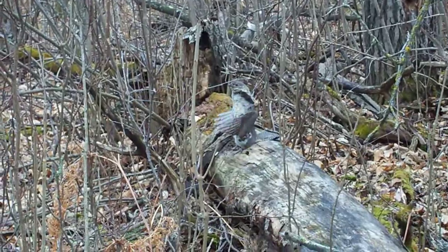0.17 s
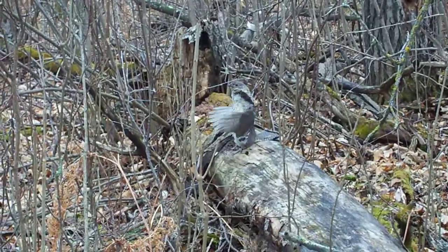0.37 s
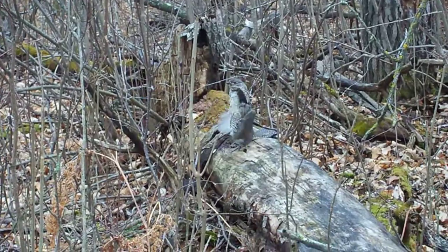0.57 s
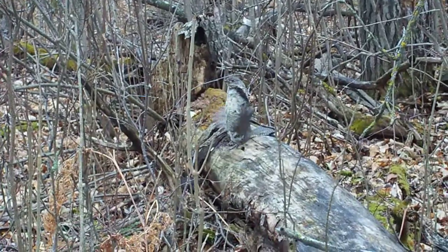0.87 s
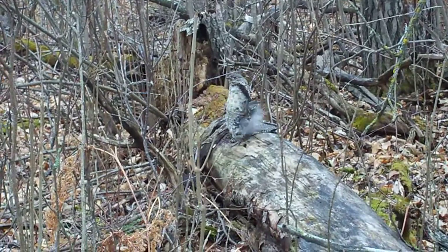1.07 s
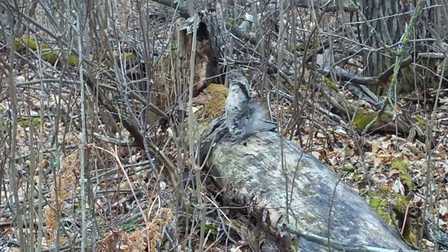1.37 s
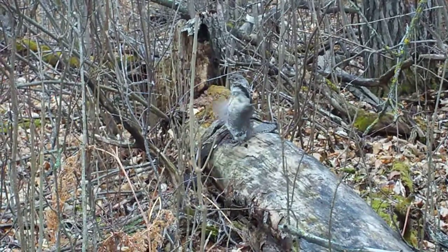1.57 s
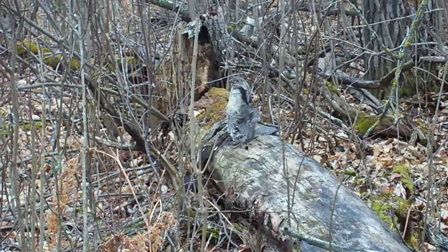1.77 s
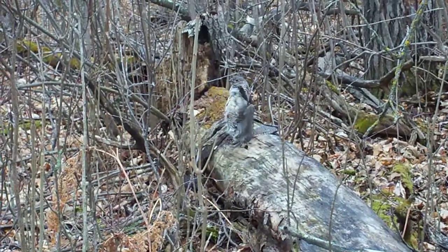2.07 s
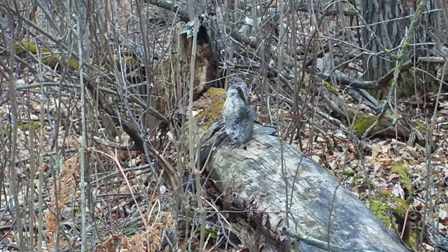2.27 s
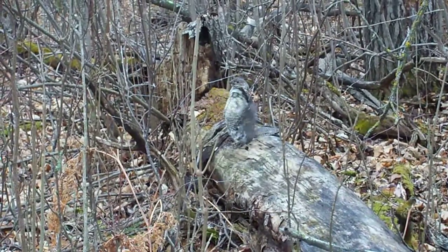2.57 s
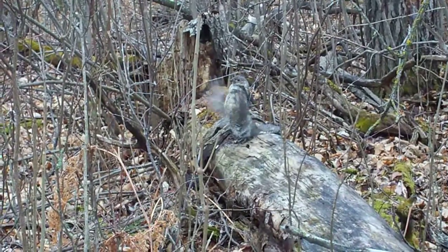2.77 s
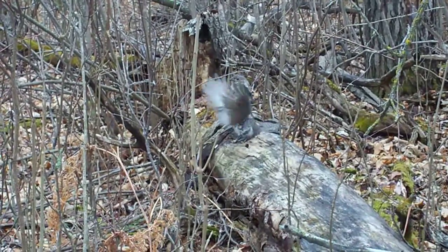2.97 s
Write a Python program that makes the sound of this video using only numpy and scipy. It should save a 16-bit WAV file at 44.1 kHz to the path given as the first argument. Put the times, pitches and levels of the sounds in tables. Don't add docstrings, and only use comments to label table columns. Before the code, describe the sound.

A grouse drums its wings in deep soft thumps that quicken into a whirring flutter, quiet forest

```python
import sys
import numpy as np
from scipy import signal
from scipy.fft import rfft, irfft
from scipy.io import wavfile
from scipy.ndimage import uniform_filter1d

SR = 44100
rng = np.random.default_rng(int(sys.argv[2]) if len(sys.argv) > 2 else 0)


def field_ratio(decibels):
    return 10 ** (np.asarray(decibels, dtype=float) / 20)


def put_to_file(sound):
    columns = np.atleast_2d(sound).T
    safe = np.clip(columns, -1, 1)
    whole_steps = np.round(safe * 32767)
    wavfile.write(sys.argv[1], SR, whole_steps.astype(np.int16))


N = 138033


def coloured(points, x):
    hz = np.fft.rfftfreq(len(x), 1 / SR)
    point_hz, point_db = np.transpose(points)
    gain_db = np.interp(np.log(hz + 1), np.log(point_hz + 1), point_db, -99, -99)
    y = irfft(rfft(x) * field_ratio(gain_db), len(x))
    return y / np.std(y)


def slow(span_s):
    span = int(span_s * SR)
    x = uniform_filter1d(uniform_filter1d(rng.standard_normal(N), span), span)
    return x / np.std(x)


def ring(x, hz, width_hz):
    return signal.lfilter(*signal.iirpeak(hz, hz / width_hz, SR), x)


# (frequency [Hz], level [dB per Hz])
HISS_COLOUR = [(150, -43.5), (250, -5.5), (380, -5), (446, -7.5), (2920, -14.5), (3180, -15), (7900, -16.5),
               (10300, -51.5), (17400, -120)]
# (frequency [Hz], level [dB per Hz])
RUMBLE_COLOUR = [(18, -30), (30, 0), (55, 1), (105, -12), (140, -15), (220, -18.5), (300, -30)]
# (start [s], length [s], level [dB], pitch [Hz])
WHISTLE = (.46, .1, -74, 3100)


def forest(t):
    start, length, db, hz = WHISTLE
    swell = np.sin(np.pi * np.clip((t - start) / length, 0, 1))
    whistle = field_ratio(db) * swell * np.sin(2 * np.pi * hz * t)
    hiss = field_ratio(-63.5 + 1.2 * slow(0.029)) * coloured(HISS_COLOUR, rng.standard_normal(N))
    rumble = field_ratio(-55 + 0.53 * slow(0.033)) * coloured(RUMBLE_COLOUR, rng.standard_normal(N))
    return hiss + rumble + whistle


# (pressure trough [s], push level [dB], swish level [dB], push pitch before scaling [Hz])
WING_BEATS = [(0.078, -28, -47, 69.6), (0.3381, -29, -47, 67.7), (0.577, -28.5, -47, 67.4),
              (0.7925, -29, -46.5, 70), (0.9914, -30, -47.5, 75.3), (1.1789, -29, -47.5, 71),
              (1.3498, -29.0, -47.7, 70.4), (1.5088, -29.5, -46.5, 61.6), (1.6573, -31, -46.5, 69.5),
              (1.7894, -31, -48, 66.7), (1.916, -32, -48, 64.4), (2.0328, -32, -49.5, 66),
              (2.1395, -32, -49, 63), (2.2418, -29.5, -48, 63.4), (2.3372, -30.5, -48.5, 63.0),
              (2.4243, -33.5, -47, 66), (2.5069, -29.5, -48, 66), (2.583, -32, -46, 63),
              (2.6537, -31.5, -46.5, 64), (2.7174, -30, -45.5, 64.0), (2.7745, -29.5, -45, 70),
              (2.8252, -31, -46, 45.3), (2.8759, -30.5, -46.5, 48), (2.935, -30, -46.5, 67),
              (3, -27.5, -47.5, 60.5), (3.0688, -27.5, -49.5, 64)]


def speeds():
    slow_gap_s, full_speed_gap_s = .11, .055
    gaps = np.gradient([beat[0] for beat in WING_BEATS])
    return np.clip((slow_gap_s - gaps) / (slow_gap_s - full_speed_gap_s), 0, 1)


def push(u, hz):
    peak_s, rise_s, fall_s = .0032, .008, .0088
    lead_s, glide_per_s, octave_share = .0006, 5., 0.12
    swell = np.exp(-.5 * ((u - peak_s) / np.where(u < peak_s, rise_s, fall_s)) ** 2)
    turn = 2 * np.pi * hz * (u + lead_s) * (1 + glide_per_s * u)
    return -swell * (np.cos(turn) + octave_share * np.cos(2 * turn))


def trees(x):
    boom_db, boom_t60_s = -19, .3
    space = np.zeros(SR // 2)
    at = np.arange(900, SR // 2 - 200, 200)
    tail = rng.standard_normal(len(at)) * field_ratio(-60 * at / SR / boom_t60_s)
    space[at] = field_ratio(boom_db) * tail / np.linalg.norm(tail)
    space[0] = 1
    return signal.fftconvolve(x, space)[:N]


# (delay [s], level [dB])
PUSH_ECHOES = [
    (.022, -24),
    (.034, -18),
    (.0495, -16),
]


def pushes(t):
    trim_db, pitch_scale, lowest_hz = 1.75, .84, 53
    echo_wobble_db, echo_jitter_s = 2.5, .0012
    out = np.zeros(N)
    for s, db, _, push_hz in WING_BEATS:
        near = slice(max(round((s - .05) * SR), 0), round((s + .12) * SR))
        u = t[near] - s
        hz = max(pitch_scale * push_hz, lowest_hz)
        pulse = push(u, hz)
        for delay, echo_db in PUSH_ECHOES:
            level_chance, time_chance = rng.standard_normal(2)
            late = u - delay - echo_jitter_s * time_chance
            pulse = pulse + field_ratio(echo_db + echo_wobble_db * level_chance) * push(late, hz / pitch_scale)
        out[near] += field_ratio(db + trim_db) * pulse
    return trees(out)


# (centre [s], width [s], level [dB], gain at full speed [dB])
SWISH_STROKES = [
    (-.017, 0.0024, -8.5, -5),
    (-.001, 0.0089, -1.52, -4),
    (0.014, 0.0063, -4.5, 1),
    (0.043, 0.055, -19.5, -2.5),
]
# (time [s], level [dB])
RUSTLE = [
    (0, -77),
    (2.3, -87.5),
    (2.6, -63),
    (2.82, -55),
    (2.95, -54.5),
    (3.02, -66),
    (3.13, -63),
]
# (frequency [Hz], level [dB per Hz])
FEATHER_COLOUR = [(150, -37), (250, -1.5), (472, -6), (892, -1.5), (1840, -8.5), (3470, -11), (7140, -14),
                  (7900, -14), (10300, -50), (17400, -120)]
# (frequency [Hz], width [Hz], level [dB])
QUILL_HUMS = [
    (673, 410, -11),
    (295.5, 87, -14),
    (176, 90, -5.5),
]
# (time [s], level [dB])
HUM_EFFORT = [
    (0, -7),
    (.8, -11.5),
    (1.5, 1),
    (2.0, -3),
    (2.4, -4.5),
    (2.85, 2),
    (3.13, -16),
]


def swish_power(t):
    wobble_db, jitter_s = 1.5, .0018
    power = field_ratio(np.interp(t, *np.transpose(RUSTLE))) ** 2
    for (s, _, db, _), speed in zip(WING_BEATS, speeds()):
        for mid, width, part_db, fast_db in SWISH_STROKES:
            time_chance, level_chance = rng.standard_normal(2)
            u = (t - s - mid - jitter_s * time_chance) / width
            level = field_ratio(db + part_db + fast_db * speed + wobble_db * level_chance)
            power = power + level ** 2 * np.exp(-u ** 2)
    return power


def torn_air():
    ticks_per_s, tick_db, tick_spread_db, flutter_db = 220, -10, 3.5, 1.5
    hits = rng.random(N) < ticks_per_s / SR
    sizes = field_ratio(tick_spread_db * np.minimum(rng.exponential(1, N), 2))
    ticks = hits * sizes * rng.choice([-1, 1], N)
    flutter = rng.standard_normal(N) * field_ratio(flutter_db * slow(0.0025))
    return flutter + field_ratio(tick_db) * ticks * np.sqrt(SR / ticks_per_s)


def swishes(t):
    trim_db = -0.5
    power = swish_power(t)
    air = torn_air()
    hum = np.zeros(N)
    for hz, width, db in QUILL_HUMS:
        tone = ring(ring(air, hz, width), hz, width)
        hum += field_ratio(db) * tone / np.std(tone)
    effort = field_ratio(np.interp(t, *np.transpose(HUM_EFFORT)))
    return field_ratio(trim_db) * np.sqrt(power) * (coloured(FEATHER_COLOUR, air) + effort * hum)


# (centre [s], pitch [Hz], width [s], level [dB], gain at full speed [dB])
WING_CLAPS = [
    (-.001, 731, 0.0017, -2, -0.5),
    (.012, 760, 0.0022, -5, 6.5),
    (.011, 308, 0.0035, -9.5, 5.5),
]


def claps(t):
    wobble_db, jitter_s, pitch_spread = 2., .002, .12
    out = np.zeros(N)
    for (s, _, db, _), speed in zip(WING_BEATS, speeds()):
        near = slice(round((s - .03) * SR), round((s + .04) * SR))
        for mid, hz, width, part_db, fast_db in WING_CLAPS:
            time_chance, level_chance, pitch_chance, phase = rng.standard_normal(4)
            u = t[near] - s - mid - jitter_s * time_chance
            size = field_ratio(db + part_db + fast_db * speed + wobble_db * level_chance)
            tone = np.sin(2 * np.pi * (hz * (1 + pitch_spread * pitch_chance) * u + phase))
            out[near] += size * np.exp(-.5 * (u / width) ** 2) * tone
    return out


# (time [s], level [dB], pitch [Hz])
FEATHER_SNAPS = [
    (.092, -41, 3460),
    (2.891, -44, 4300),
    (2.979, -42.5, 2630),
]


def snaps(t):
    out = np.zeros(N)
    for s, db, hz in FEATHER_SNAPS:
        out += field_ratio(db) * np.exp(-((t - s) / 0.00041) ** 2) * np.sin(2 * np.pi * hz * (t - s))
    return out


def scene():
    t = np.arange(N) / SR
    return (forest(t) + pushes(t) + swishes(t) + claps(t) + snaps(t))[None]


# (frequency [Hz], level [dB])
TREBLE_ROLL_OFF = [(7200, 0.5), (7800, -2.5), (8300, -11.5), (8700, -21.5), (9000, -36.5), (9200, -51)]


def microphone(dry):
    fold_hz, offset = 8000, -.0247
    hz = np.fft.rfftfreq(N, 1 / SR)
    low = irfft(rfft(dry) * (hz < fold_hz), N)
    mirrored = low * (1 + 2 * np.cos(4 * np.pi * fold_hz * np.arange(N) / SR))
    gain_db = np.interp(hz, *np.transpose(TREBLE_ROLL_OFF), right=-99)
    return irfft(rfft(mirrored) * field_ratio(gain_db), N) + offset


def band_limit(x):
    return signal.sosfilt(signal.butter(12, 9100, fs=SR, output="sos"), x)


def record(dry):
    mix = microphone(dry)
    return band_limit(mix)


dry = scene()
out = record(dry)
put_to_file(out)
```